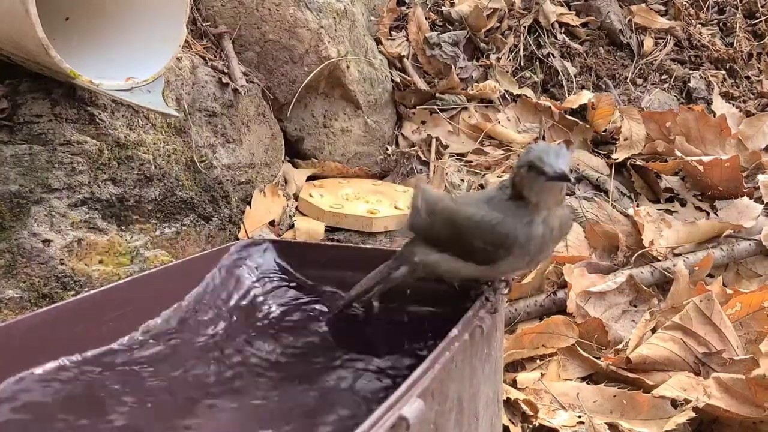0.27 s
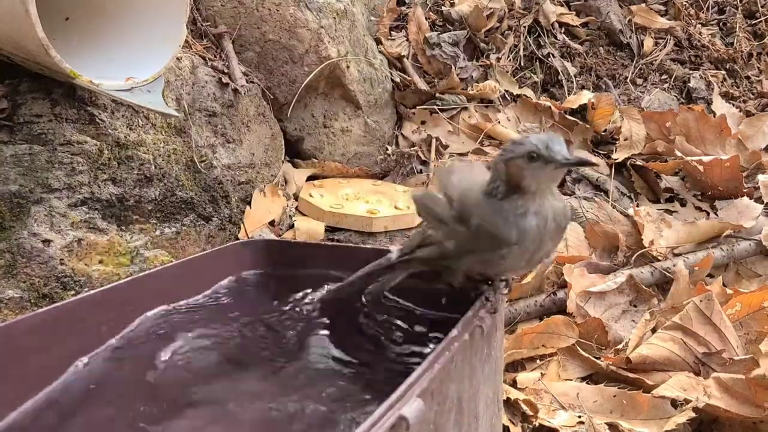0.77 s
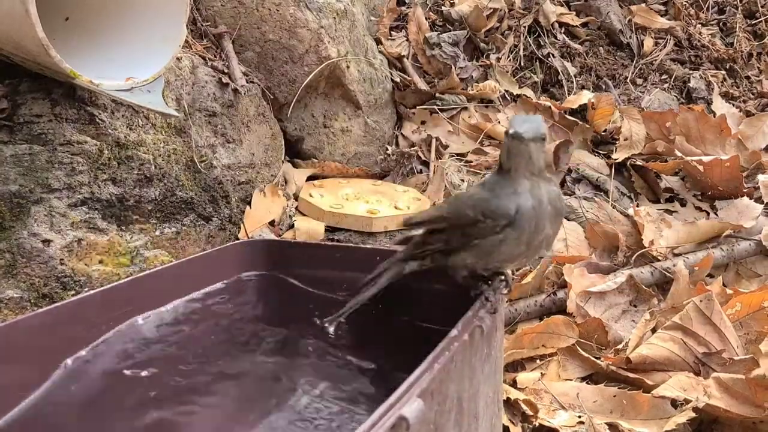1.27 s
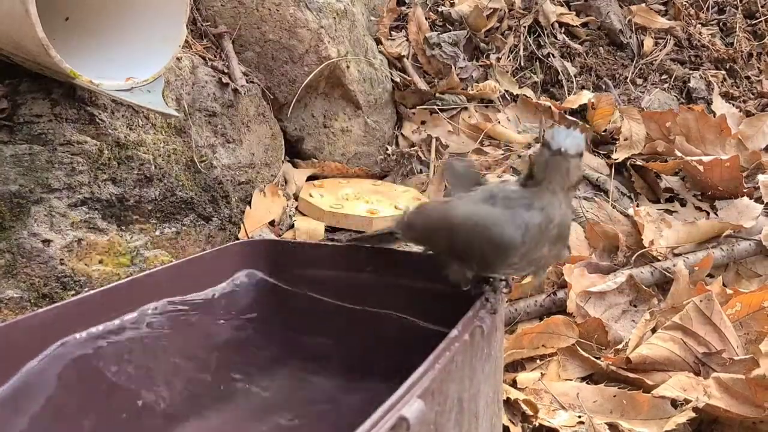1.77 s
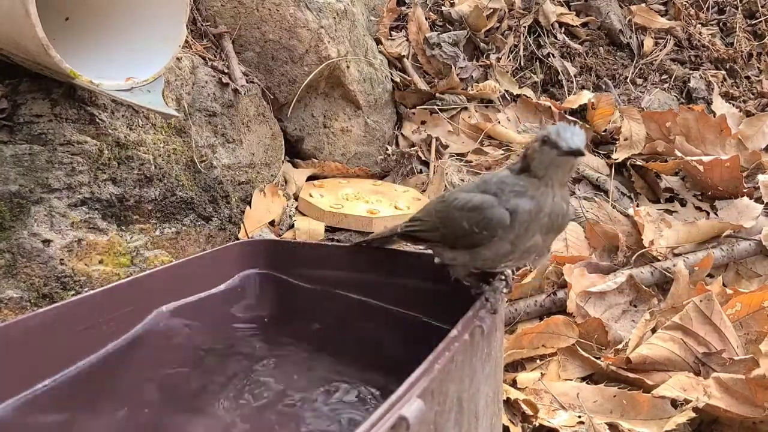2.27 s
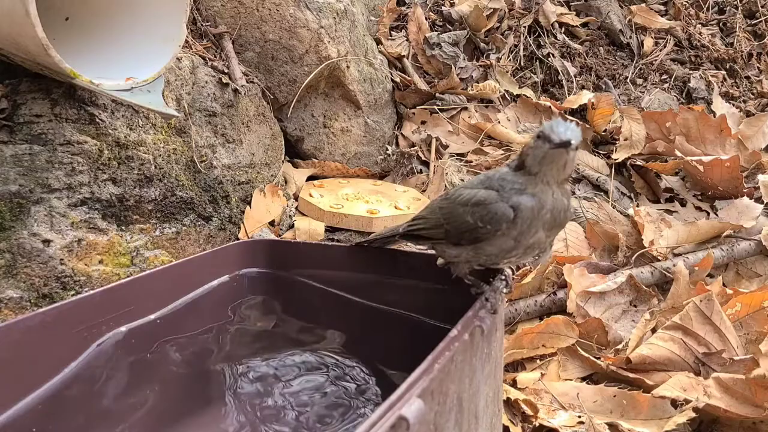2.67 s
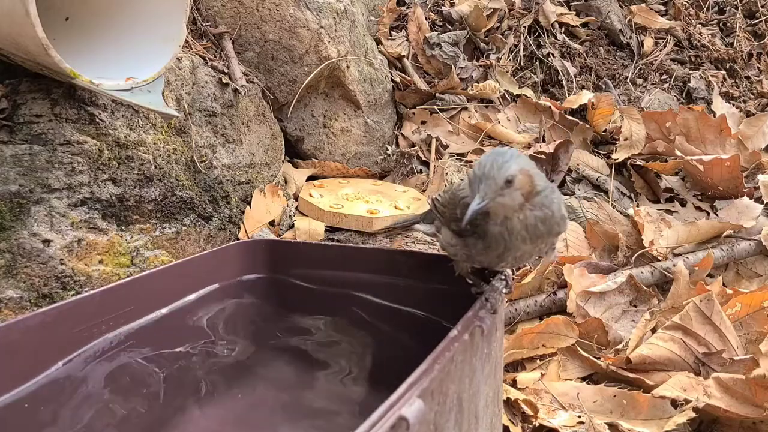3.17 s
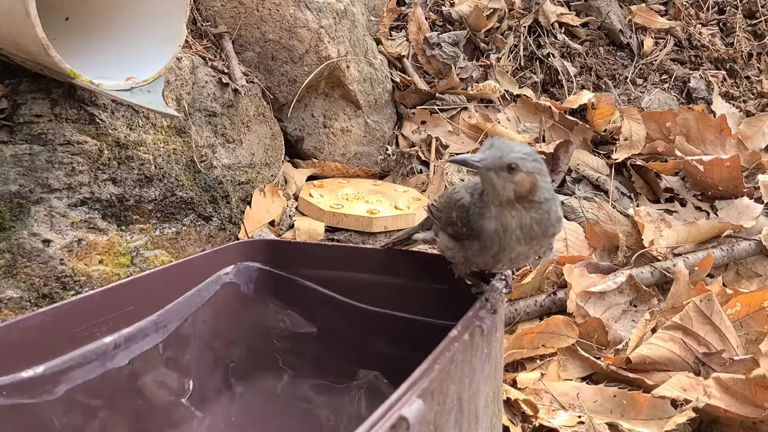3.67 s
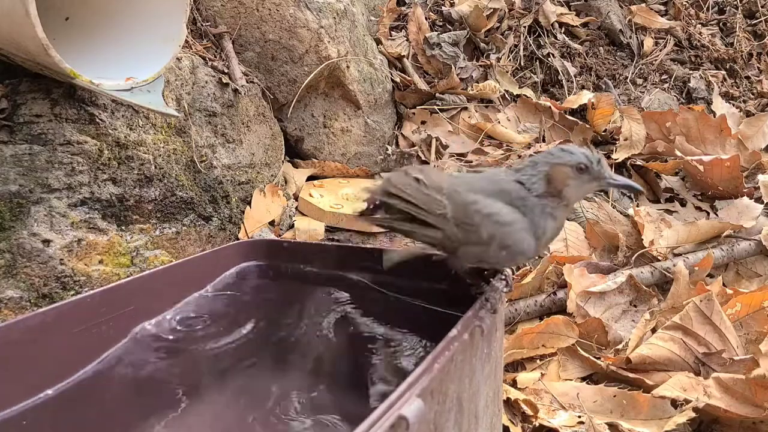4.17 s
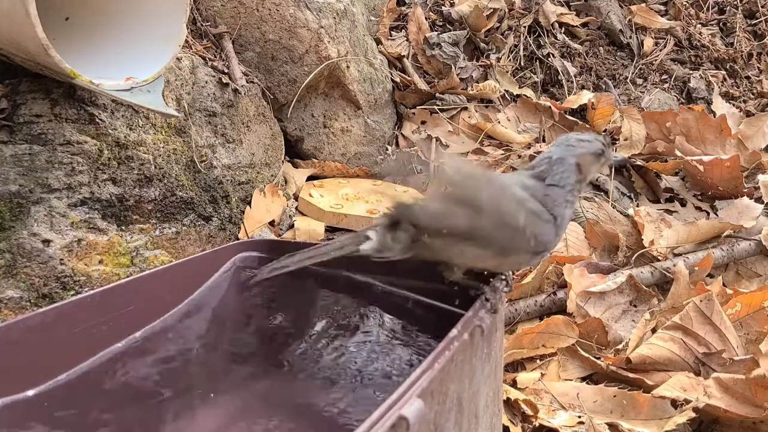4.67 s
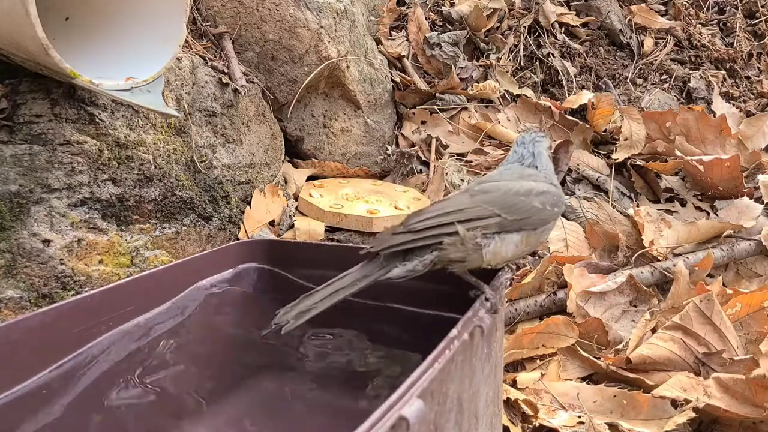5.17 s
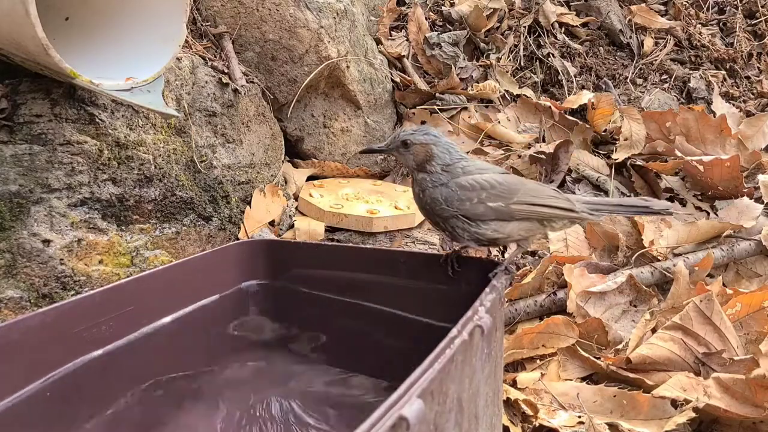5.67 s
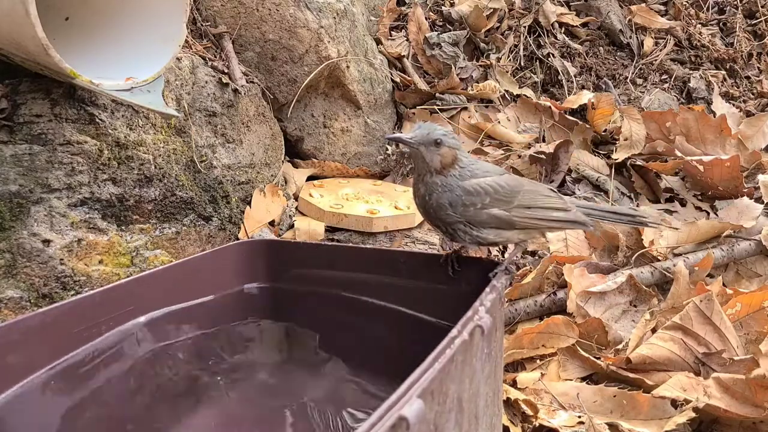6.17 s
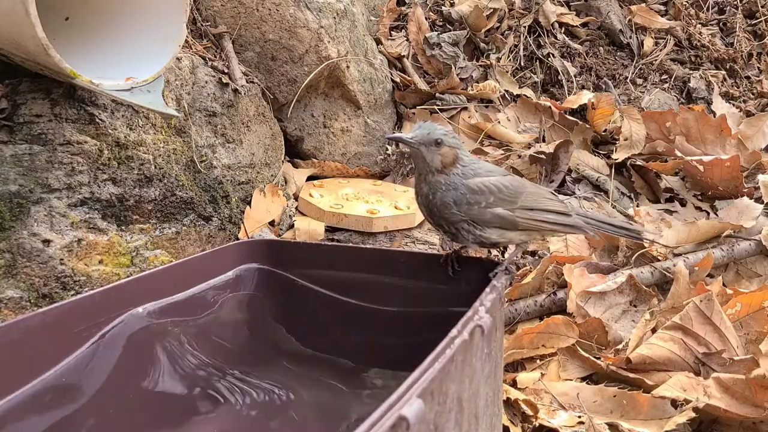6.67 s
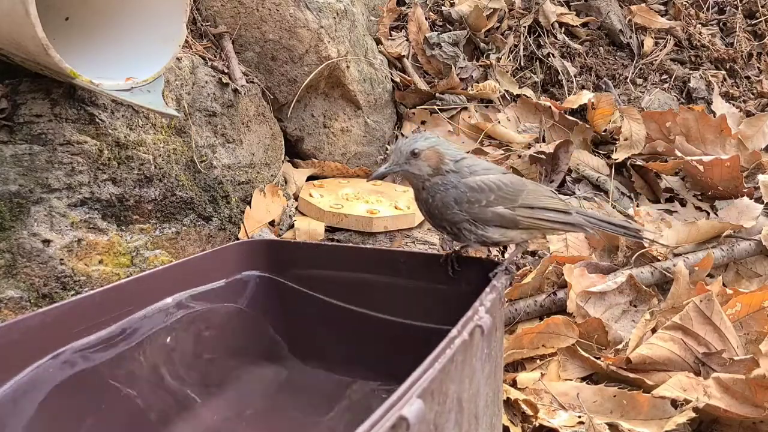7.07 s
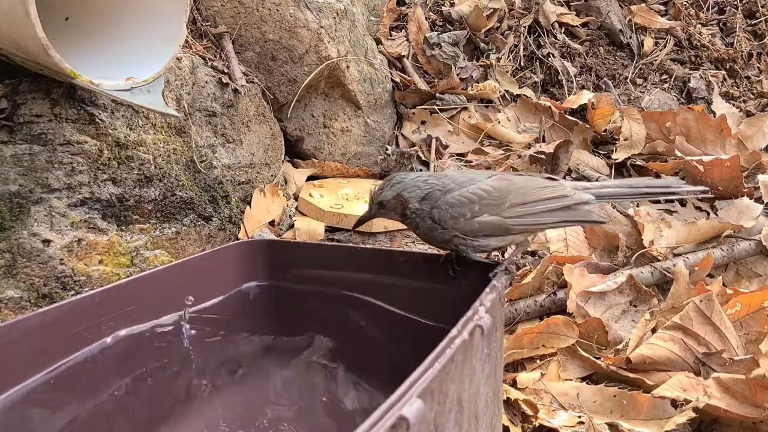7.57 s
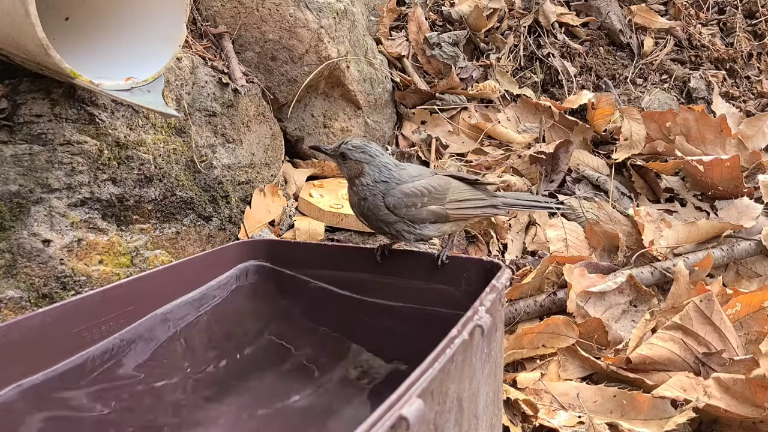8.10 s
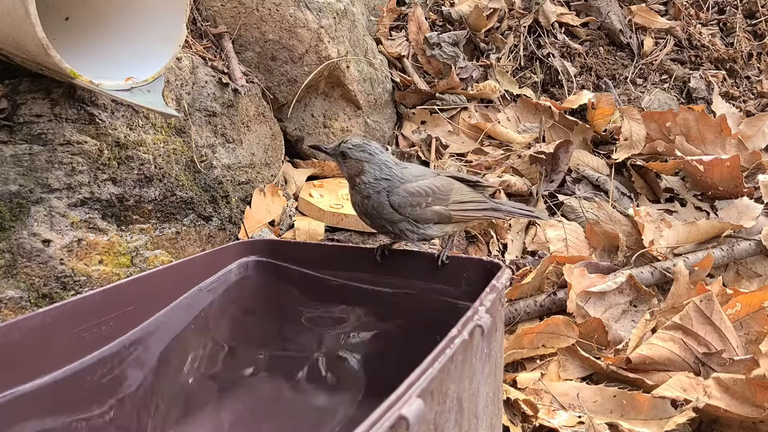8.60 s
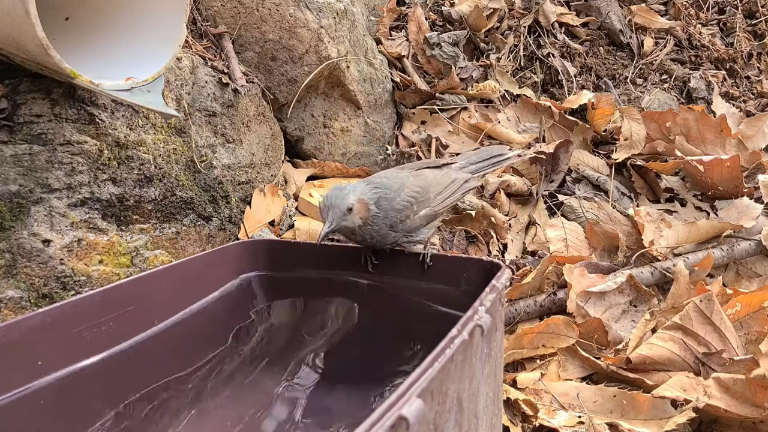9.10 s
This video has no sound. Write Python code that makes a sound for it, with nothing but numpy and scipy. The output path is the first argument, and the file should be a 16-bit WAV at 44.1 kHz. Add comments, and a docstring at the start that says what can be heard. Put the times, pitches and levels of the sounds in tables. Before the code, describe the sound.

Close by, a wet bird shakes its wings in quick, rustling bouts on the rim of a plastic tub, flinging droplets, with one beat slapping hard. After a last flurry its claws tick on the rim and it squeaks once. Water laps and gurgles softly in the tub throughout. Other small birds whistle, chip and rasp in the surrounding woodland over a low distant rumble.

```python
"""A wet bulbul shakes its wings in quick bouts on the rim of a plastic tub, one beat slapping hard.
Each stroke puffs air, rubs wet feathers and flings droplets. Its claws tick, it squeaks once, and
the water slops and gurgles with ringing bubbles. Other small birds whistle, chip and rasp among
the trees, over a low distant rumble."""
import sys
import numpy as np
from scipy import signal
from scipy.fft import rfft, irfft
from scipy.io import wavfile
from scipy.ndimage import uniform_filter1d

SR = 44100
rng = np.random.default_rng(int(sys.argv[2]) if len(sys.argv) > 2 else 0)


def generate_wav(sig):
    """Save sig (samples, or channels by samples) to the path in sys.argv[1] as 16-bit PCM at SR."""
    pcm = np.round(np.clip(np.atleast_2d(sig).T, -1, 1) * 32767).astype(np.int16)
    wavfile.write(sys.argv[1], SR, pcm)


N = 411894
TIME = np.arange(N) / SR
FREQ = np.maximum(np.fft.rfftfreq(N, 1 / SR), 1)

# Bouts of wing shaking. Each row: first and last beat in seconds, beat count, late drift, swell, fade
# and beat half length in seconds, then air push, rustle and loose feathers in relative dB.
WING_BOUTS = [(.053, 0.862, 15, -0.023, 0.52, 0.092, 0.007, -50.5, -57.5, -61.5),
              (1.435, 2.136, 14, .019, 0.26, .04, 0.0064, -44.5, -53, -59.5),
              (4.123, 4.425, 8, .012, 0.0046, .01, 0.0028, -47, -52.5, -58.5),
              (4.54, 4.6, 2, 0, .006, .005, .0058, -44, -50.5, -60.5),
              (4.72, 4.844, 3, .02, .005, .02, 0.0073, -45, -50.5, -59.5)]


def undb(db):
    return 10 ** (np.asarray(db) / 20)


def unit(x):
    """Scale to rms 1."""
    return x / np.sqrt(np.mean(x ** 2))


def across(points):
    """Interpolate (Hz, value) points over log frequency."""
    hz, value = np.transpose(points)
    return np.interp(np.log(FREQ), np.log(hz), value)


def add(out, start_s, x):
    """Mix x into out."""
    i = max(int(start_s * SR), 0)
    out[i:i + len(x)] += x[:max(N - i, 0)]


def walk(rate_hz):
    """Smooth random drift, spread near 1."""
    hold = int(SR / rate_hz)
    steps = np.repeat(rng.standard_normal(N // hold + 1), hold)
    return 1.55 * uniform_filter1d(uniform_filter1d(steps, hold), hold)[:N]


def wash(colour, grain_db=0):
    """Stereo noise at rms 1, shaped by (Hz, dB) points; grain_db roughens it."""
    # Stereo width. Each row: frequency in Hz, left-right correlation.
    correlation = [(60, .88), (300, .9), (700, .78), (1400, .45), (3000, .15), (7000, -.05)]
    low_hz, high_hz = colour[0][0], colour[-1][0]
    skirt = 1 / (1 + (low_hz / FREQ / 1.2) ** 6) / (1 + (FREQ / high_hz / 1.2) ** 6)
    sizes = np.minimum(rng.exponential(size=N // 16 + 1), 5)
    grains = undb(grain_db * np.repeat(sizes, 16)[:N])
    mid, side = rfft(rng.standard_normal((2, N)) * grains) * undb(across(colour)) * skirt
    alike = across(correlation)
    mid, side = mid * np.sqrt(1 + alike), side * np.sqrt(1 - alike)
    return unit(irfft([mid + side, mid - side], N))


def pan(db):
    """Channel gains for a left minus right level."""
    return undb(np.array([[db], [-db]]) / 2)


def place(x, lag_ms, pan_db, wet_db, t60_s):
    """Direct sound, lag_ms later on the left, plus a short tail off rocks and trunks."""
    t = TIME[:SR // 2]
    tail = rng.standard_normal((2, len(t))) * undb(-60 * t / t60_s) * (1 - np.exp(-t / .0012))
    tail /= np.sqrt(np.sum(tail ** 2) / 2)
    delay = np.exp(np.array([[-1j], [1j]]) * np.pi * FREQ * lag_ms / 1000)
    direct = irfft(rfft(x) * delay, N)
    return direct * pan(pan_db) + undb(wet_db) * signal.fftconvolve([x, x], tail, axes=1)[:, :N]


def woodland(air_db=-63, hiss_db=-82):
    """Far throbbing rumble, soft air and a thin high hiss."""
    # Rumble strength. Each row: time in seconds, level in dB.
    rumble_levels = [(0, -46.5), (2.5, -45), (3.05, -41.5), (4.5, -45.5), (6.1, -43.5), (7.3, -44),
                     (8.4, -46), (9.34, -44)]
    # Rumble and air spectra. Each row: frequency in Hz, density in relative dB.
    rumble_colour = [(20, -23), (33, -12.5), (43, -5.5), (51, 0), (61, -3.5), (70, 1), (82, -8.5),
                     (110, -13), (150, -25), (220, -43), (400, -79)]
    air_colour = [(130, -13), (190, -4), (250, -6.5), (380, -4.5), (580, -8.5), (830, -9), (1150, -12.5),
                  (1900, -14.5), (2600, -17), (4200, -22), (6200, -29), (9500, -32), (15500, -31)]
    rumble = wash(rumble_colour) * undb(np.interp(TIME, *np.transpose(rumble_levels)))
    breeze = undb(.5 * walk(3))
    air = wash(air_colour) * undb(air_db) * breeze
    hiss = wash([(6500, -15.5), (7700, -5), (9000, -22)]) * undb(hiss_db)
    return rumble + air + hiss


def callers():
    """Near birds chip thinly; a far one rasps, its uneven cycles smearing the harmonics."""
    # Chips. Each row: start and length in seconds, pitch in Hz, fractional fall, level in dB.
    chips = [(.01, 0.16, 2560, 0.096, -70), (.262, 0.3, 2300, 0.037, -74), (5.165, 0.027, 2650, .14, -64),
             (5.217, 0.012, 3670, 0.3, -56), (5.901, .04, 6280, .08, -70), (2.285, .05, 4690, 0.056, -76.5),
             (3.697, .02, 2940, -0.021, -66), (5.97, .04, 2720, .15, -72), (6.15, .025, 6350, .07, -73),
             (6.437, 0.074, 2054, -0.054, -73), (6.61, 0.17, 2190, -0.034, -72.5),
             (6.84, 0.15, 2224, -.03, -74), (7.054, .046, 3010, -0.17, -65), (7.597, 0.02, 1983, 0.12, -56),
             (8.995, .028, 2250, 0, -60.5)]
    # Rasps. Each row: start and length in seconds, pitch in Hz, fractional fall, throat resonance
    # in Hz, level in dB.
    rasps = [(2.717, 0.037, 863, 0.26, 2270, -62), (2.792, 0.04, 753, 0.18, 2200, -64.5),
             (2.853, 0.042, 727, -0.015, 2050, -62.5), (7.595, 0.021, 1020, 0.12, 2010, -57.5),
             (7.967, .02, 904, .2, 2970, -64), (8.077, 0.041, 850, 0, 3080, -68.5),
             (8.372, 0.033, 1030, -.22, 3440, -52.5), (8.507, .018, 1085, 0.025, 3380, -64),
             (8.534, 0.024, 895, 0.23, 2700, -59.5), (8.594, 0.025, 920, -0.16, 3040, -58.5),
             (8.667, 0.0302, 1019, 0.114, 3260, -50.5), (8.702, .016, 1083, -0.11, 3500, -59),
             (8.728, 0.027, 1094, -0.18, 3660, -56), (8.762, 0.06, 1005, -0.014, 3960, -59.5),
             (8.903, 0.033, 778, -0.017, 1930, -52.5), (9.058, 0.025, 749, -0.16, 2480, -54)]
    near, far = np.zeros((2, N))
    k = np.arange(1, 9)[:, None]  # harmonic numbers
    jitter, flutter = walk(1200), np.array([walk(900) for _ in k])

    def call(start_s, length_s, pitch_hz, fall, throat_hz, arch, rough):
        """One arched note at rms 1, harmonics shaped by the throat."""
        u = np.linspace(-1, 1, int(length_s * SR))
        i = int(start_s * SR) + np.arange(len(u))
        hz = pitch_hz * (1 - arch * u ** 2 - fall * u / 2) * (1 + .05 * rough * jitter[i])
        throat = (1 + ((k * hz / throat_hz - 1) / .52) ** 2) ** -1.5
        weight = throat * (k * hz < 7500) / k * (1 + rough * flutter[:, i])
        voice = np.sum(weight * np.sin(2 * np.pi * k * np.cumsum(hz) / SR), axis=0)
        return unit(voice * signal.windows.tukey(len(u), .65))

    for s, length_s, hz, fall, db in chips:
        add(near, s, call(s, length_s, hz, fall, hz, arch=.051, rough=.25) * undb(db))
    for s, length_s, hz, fall, throat_hz, db in rasps:
        add(far, s, call(s, length_s, hz, fall, throat_hz, arch=.17, rough=.75) * undb(db))
    return (place(near, lag_ms=-.413, pan_db=-.5, wet_db=-4, t60_s=.1)
            + place(far, lag_ms=-.25, pan_db=.5, wet_db=-2.5, t60_s=.38))


def whistler(start_hz=2100, bend=3.1, plunge_s=.013, second_hz=2276, throat_hz=4900, width_hz=420):
    """A bird to the right slurs up through its throat resonance, then plunges to a two-voiced hook."""
    # Whistles. Each row: start and rise time in seconds, top pitch in Hz, slur level and off-resonance
    # fade in relative dB, hook pitch in Hz, hook length in seconds, hook level in relative dB.
    whistles = [(.24, 0.15, 7400, -59, 5, 3300, .034, -53), (0.706, .13, 7000, -61, 3, 3370, .03, -55),
                (1.004, 0.13, 7340, -52, -1, 3370, 0.032, -52),
                (3.114, .137, 7190, -59, 3, 3494, 0.036, -51),
                (3.491, .137, 7450, -59, 8, 3180, 0.022, -53.5),
                (6.211, 0.11, 6730, -57.5, 7, 3450, 0.04, -54),
                (6.523, .131, 7560, -52.5, 10, 3550, .031, -51),
                (6.873, 0.13, 7130, -51, 5, 3290, 0.038, -53.5),
                (8.729, 0.13, 6920, -53, 12, 3260, .034, -51.5),
                (9.052, .16, 7100, -56.5, 16, 3400, 0.032, -51.5)]
    out, quaver, warble = np.zeros(N), 1 + .021 * walk(700), 1 + .022 * walk(500)
    for s, rise_s, top_hz, db, fade_db, hook_hz, hook_s, hook_db in whistles:
        t = TIME[:int((rise_s + plunge_s + hook_s) * SR)]
        i = int(s * SR) + np.arange(len(t))
        plunge = np.clip((t - rise_s) / plunge_s, 0, 1)
        held = np.clip((t - rise_s - plunge_s) / hook_s, 0, 1)
        slur_hz = start_hz + (top_hz - start_hz) * np.expm1(-bend * t / rise_s) / np.expm1(-bend)
        sagging_hz = hook_hz * warble[i] * (1 - .415 * held ** 4)
        pitch_hz = slur_hz + (sagging_hz - slur_hz) * plunge
        under_hz = second_hz + (hook_hz - second_hz) * np.exp(-12 * held)
        phase, under_phase = 2 * np.pi * np.cumsum([pitch_hz, under_hz] * quaver[i], axis=1) / SR
        resonance = np.exp(-.5 * ((slur_hz - throat_hz) / width_hz) ** 2)
        slur = undb(db - 3) * (undb(-7 - fade_db * t / rise_s) + resonance) * (1 - plunge)
        hook = undb(hook_db - 3) * plunge ** 1.5 * (1 - held ** 4)
        octave = undb(db - 10) * np.exp(-.5 * ((slur_hz - throat_hz / 2) / width_hz) ** 2)
        under = undb(hook_db - 7) * plunge ** 8 * (1 - held)
        tone = (slur + hook) * np.sin(phase) + octave * np.sin(2 * phase) + under * np.sin(under_phase)
        tone *= signal.windows.tukey(len(t), .04)
        add(out, s, tone)
        for echo_s in rng.uniform(.002, .008, 2):  # off rock and trunks
            add(out, s + echo_s, tone * undb(-12))
    out *= undb(3.5 * walk(450))
    return place(out, lag_ms=.35, pan_db=-1.6, wet_db=-4, t60_s=.22)


def bubble(hz, db, cycles, rise):
    """An air pocket rings, climbing in pitch as it nears the surface."""
    t = TIME[:int(SR * 1.5 * cycles / hz)]
    age = t * hz / cycles
    envelope = undb(db - 36 * age) * (1 - np.exp(-t * hz / 1.2))
    return envelope * np.sin(2 * np.pi * hz * t * (1 + rise * age))


def laps(count=13, spread_s=.015):
    """Each breaking wavelet traps a cluster of bubbles, smaller as it closes."""
    # Wavelets on the tub wall. Each row: time in seconds, typical bubble pitch in Hz and level in dB.
    wavelets = [(.36, 900, -57), (.6, 850, -55), (.8, 1000, -55), (2.24, 850, -57), (2.35, 660, -57),
                (2.425, 643, -57.5), (2.715, 1330, -52), (3.06, 840, -60), (2.85, 1300, -53),
                (3.231, 890, -54.5), (3.36, 697, -58), (5.08, 900, -54.5), (5.17, 560, -60.5),
                (5.54, 784, -63), (5.69, 1400, -51), (5.87, 554, -60), (5.94, 736, -60), (6.02, 830, -62.5),
                (6.23, 740, -65), (6.33, 720, -61), (6.48, 846, -60), (6.615, 874, -55), (6.68, 760, -58.5),
                (6.815, 925, -53), (6.93, 850, -61.5), (7.11, 850, -52.5), (7.275, 823, -56.5),
                (7.44, 800, -54.5), (7.56, 720, -57.5), (7.78, 1190, -54.5), (8.02, 724, -62),
                (8.105, 674, -58), (8.37, 765, -55.5), (8.57, 856, -60)]
    out = np.zeros(N)
    for s, hz, db in wavelets:
        for when, pitch, size in np.clip(rng.standard_normal((count, 3)), -2, 2):
            bubble_hz = hz * np.exp(.13 * pitch + .09 * when)
            add(out, s + spread_s * when, bubble(bubble_hz, db + 2 * size, cycles=14.6, rise=.2))
    return out


def hollow(x, direct_db=-4):
    """The air in the tub rings with the water."""
    # Air modes. Each row: frequency in Hz, bandwidth in Hz, gain in dB.
    modes = [(586, 28, 1), (724, 25, 3.5), (850, 44, 0), (1012, 32, -6), (1150, 56, -4)]
    ring = sum(undb(db) * signal.lfilter(*signal.iirpeak(hz, hz / width_hz, SR), x)
               for hz, width_hz, db in modes)
    return undb(direct_db) * x + ring


def water(lap_hz=880, count=800):
    """Clear gurgles and drops among many little bubbles that swell with the waves."""
    # Large air pockets closing; drops striking. Each row: start in seconds, pitch in Hz, level in dB.
    pockets = [(1.003, 484, -45.5), (1.325, 694, -45.5), (2.222, 783, -48), (4.049, 702, -43.5),
               (4.898, 767, -43), (5.375, 1140, -42.5), (6.77, 532, -47), (7.06, 725, -49.5),
               (7.893, 339, -49), (8.079, 523, -46), (9.304, 560, -43), (9.317, 738, -45.5)]
    impacts = [(0.1135, 2800, -24), (0.123, 2400, -40), (0.141, 2900, -45), (2.1, 2700, -26),
               (1.8126, 3390, -28)]
    gurgles, drops, lapping = np.zeros((3, N))
    for s, hz, db in pockets:
        add(gurgles, s, bubble(hz, db, cycles=23.4, rise=.293))
    for s, hz, db in impacts:
        add(drops, s, bubble(hz, db, cycles=22, rise=.13))
    for (when, size), pitch in zip(rng.random((count, 2)), np.clip(rng.standard_normal(count), -2, 2)):
        hz = lap_hz * np.exp(.417 * pitch)
        add(lapping, when * N / SR, bubble(hz, -69 + 14 * size ** 3, cycles=27.7, rise=.195))
    waves = undb(2.3 * walk(9))
    slop = gurgles + hollow(laps() + lapping * waves)
    return (place(slop, lag_ms=0, pan_db=0, wet_db=-6, t60_s=.07)
            + place(drops, lag_ms=-.2, pan_db=.5, wet_db=-14, t60_s=.06))


def claws(t60_s=.06, faint_count=26):
    """Claws scratch the rim in short bright ticks, with fainter ones at random."""
    # Claw ticks. Each row: start in seconds, level in dB.
    ticks = [(2.781, -64), (3.013, -65.5), (3.444, -64), (4.898, -50), (4.911, -44), (4.932, -56),
             (5.065, -56.5), (5.425, -47), (5.451, -43), (5.465, -46), (5.477, -46), (5.613, -53.5),
             (5.640, -55.5), (7.831, -55), (8.940, -52.5)]
    t, envelope = TIME[:SR // 6], np.zeros(N)
    faint = [(when * N / SR, -73 + 10 * size ** 2) for when, size in rng.random((faint_count, 2))]
    for s, db in ticks + faint:
        add(envelope, s, undb(db - 60 * t / t60_s) * (1 - np.exp(-t / .00016)))
    scratch = wash([(600, -1), (2500, 4), (5000, 2.5), (8500, 4), (15000, 4.5)], grain_db=4)
    return envelope * scratch * pan(.5)


def squeak(start_s=5.388, length_s=.085, pitch_hz=1997, throb_hz=28.6, attack_s=.029, release_s=.01):
    """The bulbul's close, dry squeak throbs and sags ever faster."""
    # Harmonics, the second lifted by the throat. Each row: multiple, level in relative dB.
    harmonics = [(1, -20.5), (2, -2), (3, -31), (4, -14.5)]
    t, out = TIME[:int(length_s * SR)], np.zeros(N)
    throb = np.cos(2 * np.pi * throb_hz * t)
    hz = pitch_hz * (1 - .15 * (t / length_s) ** 2 - .01 * throb)
    phase = 2 * np.pi * np.cumsum(hz * (1 + .007 * walk(900)[:len(t)])) / SR
    voice = sum(undb(db) * np.sin(k * phase) for k, db in harmonics)
    envelope = np.minimum(t / attack_s, 1) * np.minimum((length_s - t) / release_s, 1)
    add(out, start_s, voice * envelope * undb(-36 + 2.5 * throb))
    return place(out, lag_ms=-.045, pan_db=2.4, wet_db=-18, t60_s=.1)


def droplets(shaking, count=3600):
    """Flung water lands as tiny pings, as loud as the shaking is hard."""
    out = np.zeros((2, N))
    for when, pitch, size, side in rng.random((count, 4)):
        hz = 900 * 14 ** np.sqrt(pitch)
        ping = bubble(hz, 25 * size ** 5, cycles=8, rise=.1) * shaking[int(when * N)]
        add(out[0], when * N / SR, ping * np.sqrt(side))
        add(out[1], when * N / SR, ping * np.sqrt(1 - side))
    return out


def loose_feathers(rise_db_per_s=112, fall_db_per_s=330):
    """Envelope of loose feathers: they stir before a bout, flutter through it and settle quickly."""
    envelope = np.zeros(N)
    for first_s, last_s, _, _, swell_s, *_, db in WING_BOUTS:
        swell_db = .5 * np.clip(1 - (TIME - first_s) / swell_s, 0, 1)
        before_db = rise_db_per_s * np.maximum(first_s - TIME, 0)
        after_db = fall_db_per_s * np.maximum(TIME - last_s, 0)
        envelope += undb(db - swell_db - before_db - after_db)
    return envelope * undb(2.54 * walk(70))


def snaps(beats, decay_s=.0015, per_beat=4):
    """Envelope of wet feather tips snapping free: some loud, a few faint around every beat."""
    # Loud snaps. Each row: start in seconds, level in relative dB.
    loud = [(0.05, -45.5), (.056, -50), (.169, -49), (.189, -51), (0.465, -54), (0.532, -42), (0.5751, -45),
            (0.6279, -41), (.678, -46), (.685, -50), (.6985, -50), (0.7542, -51), (.7755, -53),
            (.7985, -46), (1.4928, -41), (1.501, -48), (1.649, -39), (1.6997, -38.5), (1.705, -38.5),
            (1.8545, -45.5), (1.906, -44), (1.962, -44), (2.02, -45), (1.799, -42), (2.0675, -46),
            (2.1917, -51), (4.038, -51.5), (4.082, -47.5), (4.123, -39), (4.163, -48), (4.2004, -35),
            (4.247, -53), (4.2863, -40), (4.3326, -39.5), (4.3754, -38), (4.423, -47), (4.5353, -41),
            (4.725, -45), (4.5884, -44), (4.5955, -49), (4.6, -42), (4.7678, -42), (4.814, -50)]
    envelope, t = np.zeros(N), TIME[:SR // 100]
    faint = [(s + 1.7 * half_s * when, rustle_db - 1 + 3 * size)
             for s, half_s, _, rustle_db in beats
             for when, size in np.clip(rng.standard_normal((per_beat, 2)), -2, 2)]
    for s, db in loud + faint:
        add(envelope, s, undb(db) * np.exp(-t / decay_s))
    return envelope


def crackle(clicks_per_s=550, spread_db=14, band_hz=(700, 3600)):
    """Wet barbs click, uneven in size and scattered left to right."""
    out, count = np.zeros((2, N)), int(clicks_per_s * N / SR)
    when, size, side = rng.random((count, 3)).T
    out[:, (when * N).astype(int)] = undb(spread_db * size ** 3) * np.sqrt([side, 1 - side])
    return unit(signal.sosfilt(signal.butter(2, band_hz, "bandpass", fs=SR, output="sos"), out))


def tint(x, tilt_db=2, split_hz=4500):
    """Feathers meet at changing angles: the rustle drifts duller or brighter."""
    low = signal.sosfilt(signal.butter(1, split_hz, fs=SR, output="sos"), x)
    tilt = undb(tilt_db * walk(22))
    return low * tilt + (x - low) / tilt


def strokes(rise_db=21.5, fall_db=4.5, jitter_s=.0005, stretch=.45):
    """Wing beats: in each bout effort swells and fades, and beats lengthen as the bird tires."""
    # Accents on beats within the bouts, and a few lone wing strokes. Each row: time and half length
    # in seconds, air push and rustle in relative dB.
    accents = [(.053, 0.006, -55, -60.5), (.353, 0.0063, -55, -67), (.412, 0.0063, -62, -64),
               (.949, 0.013, -53.5, -64.5), (.681, 0.0046, -65, -51.5), (1.396, 0.0032, -44, -65),
               (1.496, 0.012, -56, -55), (1.907, .005, -51, -62), (1.963, .006, -49, -62),
               (2.199, 0.01, -50, -59.5), (4.381, 0.0037, -39.5, -54), (4.642, 0.0077, -59, -58),
               (4.662, 0.0068, -51.5, -56), (4.724, .006, -49, -63), (7.896, 0.0076, -53, -57),
               (8.885, 0.013, -51.5, -57.5), (8.928, 0.0038, -56, -55)]
    beats = list(accents)
    for first_s, last_s, count, lag_s, swell_s, fade_s, half_s, push_db, rustle_db, _ in WING_BOUTS:
        u = np.linspace(0, 1, count)
        times_s = first_s + (last_s - first_s - lag_s) * u + lag_s * u ** 4
        halves_s = half_s * (1 + stretch * (u ** 2 - .5))
        for s, beat_half_s, (late, scatter_db) in zip(times_s, halves_s, rng.standard_normal((count, 2))):
            swell_db = rise_db * max(1 - (s - first_s + half_s) / swell_s, 0)
            fade_db = fall_db * max(1 - (last_s - s + half_s) / fade_s, 0)
            effort_db = scatter_db - swell_db - fade_db
            beats.append((s + jitter_s * late, beat_half_s, push_db + effort_db, rustle_db + effort_db))
    return beats


def slap(start_s=1.446, contact_s=.00031, echo_s=.00355, echo_db=-13, rush_db=-32):
    """A wing rushes down and claps the body; the tub wall returns the clap at once."""
    # Hollow clap modes. Each row: frequency in Hz, t60 in seconds, level in relative dB.
    modes = [(133, 0.012, -15.5), (410, 0.017, -18), (577, 0.019, -12), (797, 0.012, -13),
             (1120, 0.0051, -5.5), (1470, 0.0061, -15.5), (2680, 0.0023, -0.5)]
    t, out = TIME[:SR // 8], np.zeros(N)
    clap = sum(-undb(db - 60 * t / t60_s) * np.sin(2 * np.pi * hz * t) for hz, t60_s, db in modes)
    clap *= undb(-2) * (1 - np.exp(-t / contact_s))
    add(out, start_s, clap)
    add(out, start_s + echo_s, -undb(echo_db) * clap)
    since_s = TIME - start_s
    envelope = undb(rush_db) * np.exp(-abs(since_s) / np.where(since_s < 0, .003, .007))
    rush = wash([(300, -17), (800, -10), (3200, -6.5), (5500, -13.5), (15000, -20)], grain_db=2.5)
    return place(out, lag_ms=-.05, pan_db=2.9, wet_db=-17, t60_s=.04) + envelope * rush * pan(2.9)


def wings(full_half_s=.0073, lead_s=.05):
    """Each stroke pushes a puff of air while wet feathers crackle over each other."""
    # Air swish and feather rustle spectra. Each row: frequency in Hz, density in relative dB.
    swish_colour = [(150, 6.5), (195, -4.5), (250, -14), (330, -3), (430, -5.5), (600, -8.5), (900, -10),
                    (1500, -14), (2300, -20.5), (3600, -19), (4600, -34)]
    rustle_colour = [(1500, -21), (2800, 1), (4500, -1), (6500, -1.5), (9000, -4.5), (12000, -1),
                     (15500, -1.5)]
    push, sweep, scrape = np.zeros((3, N))
    t, beats = TIME[:SR // 10] - lead_s, strokes()
    for s, half_s, push_db, rustle_db in beats:
        breadth = min(half_s / full_half_s, 1)  # short strokes snap, long ones move more air
        swell = np.exp(-.5 * np.where(t < 0, (t / (half_s * breadth)) ** 2, (abs(t) / half_s) ** 1.5))
        start_s = s - lead_s - half_s * (1 - breadth)  # a snap peaks early
        add(push, start_s, swell * undb(push_db))
        add(sweep, start_s, swell * undb(push_db) * breadth ** 2)
        add(scrape, start_s, swell * undb(rustle_db + 2.5))
    loose = loose_feathers()
    air = wash(swish_colour, grain_db=2) * (push + loose)
    thump = wash([(80, -17), (125, 12), (170, -3)]) * sweep * undb(-2)
    tub_drum = wash([(110, 4.5), (160, -3.5), (210, -7.5), (260, -11.5)]) * loose * undb(-1)
    rustle = tint(wash(rustle_colour, grain_db=2.2) * (scrape + loose) * undb(-.5))
    barbs = crackle() * (scrape + loose / 2) * undb(-4)
    cracks = wash([(700, 4.5), (2500, -.5), (6000, -2.5), (15000, -11.5)]) * snaps(beats) * undb(3)
    spray = droplets(loose + scrape / 2)
    return (air + thump + tub_drum) * pan(.9) + (rustle + barbs + cracks + spray) * pan(2.2)


def scene():
    return wings() + slap() + claws() + water() + squeak() + whistler() + callers() + woodland()


def record(dry):
    """Steep low-pass at 15.9 kHz."""
    return signal.sosfilt(signal.ellip(10, .2, 70, 15900, fs=SR, output="sos"), dry)


dry = scene()
out = record(dry)
generate_wav(out)
```